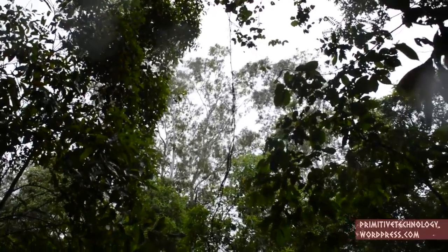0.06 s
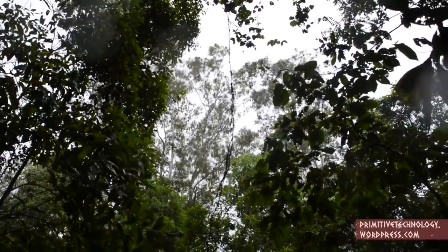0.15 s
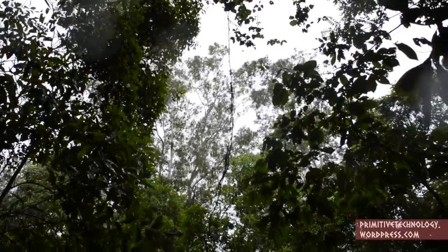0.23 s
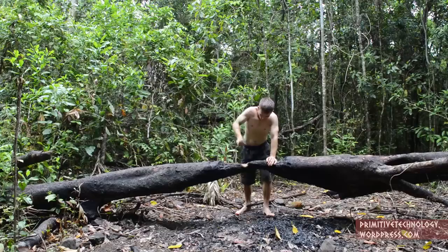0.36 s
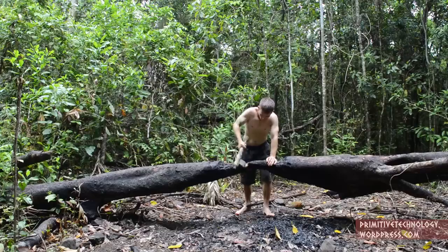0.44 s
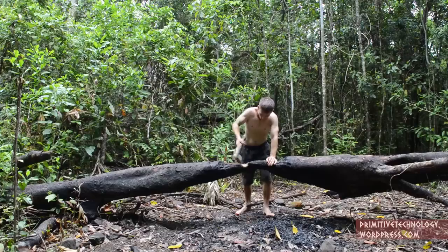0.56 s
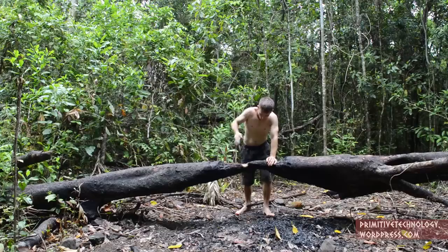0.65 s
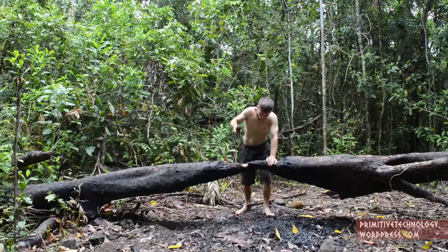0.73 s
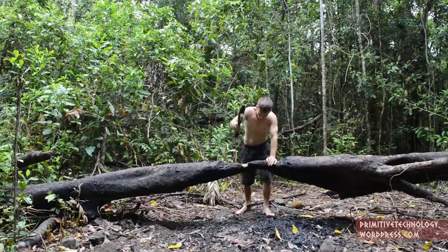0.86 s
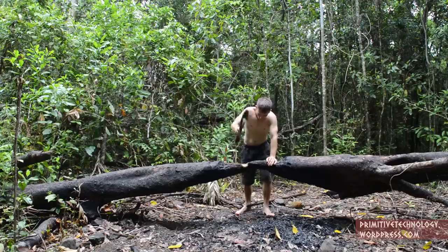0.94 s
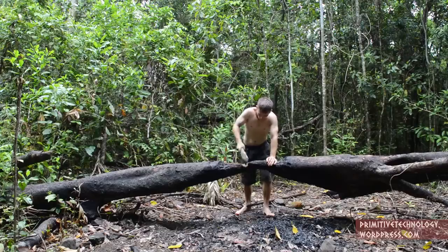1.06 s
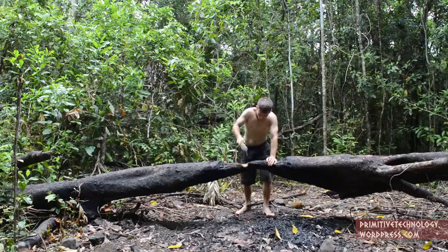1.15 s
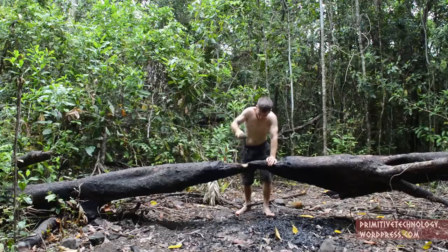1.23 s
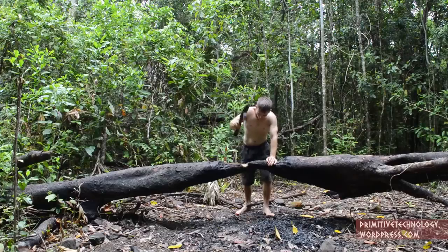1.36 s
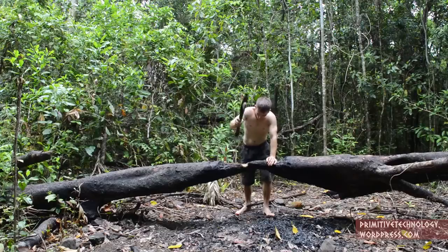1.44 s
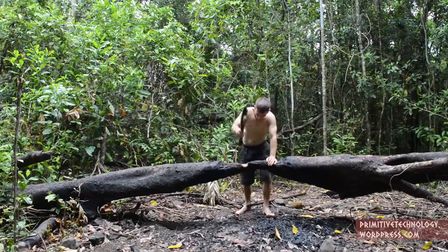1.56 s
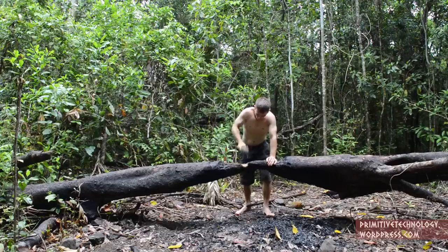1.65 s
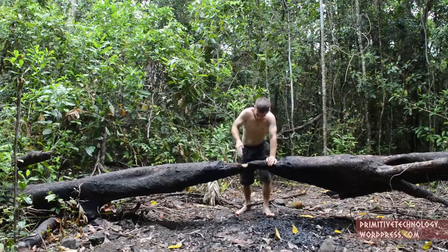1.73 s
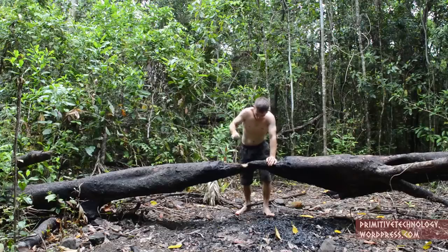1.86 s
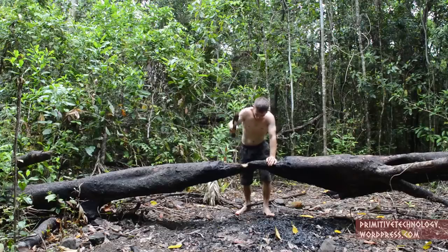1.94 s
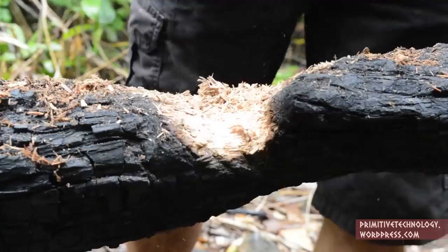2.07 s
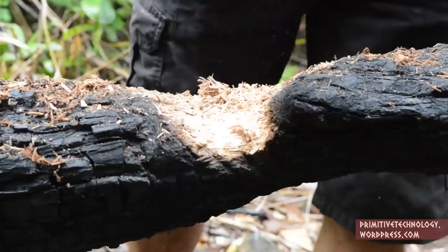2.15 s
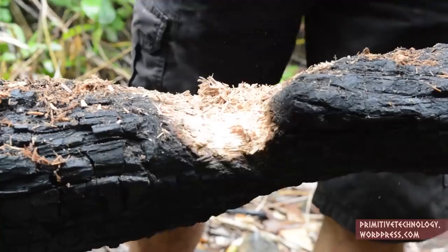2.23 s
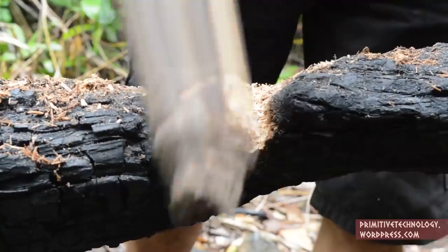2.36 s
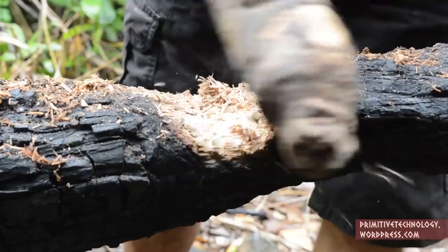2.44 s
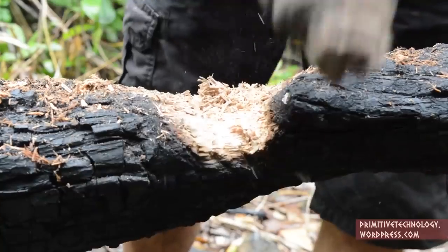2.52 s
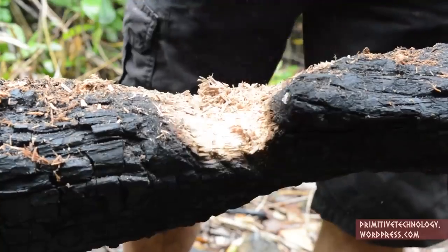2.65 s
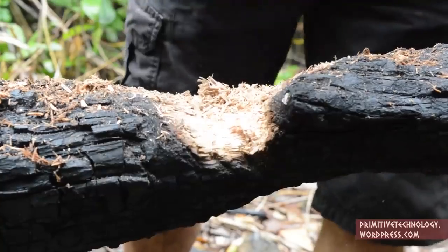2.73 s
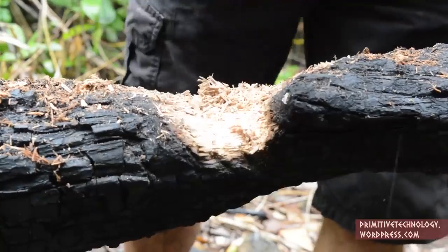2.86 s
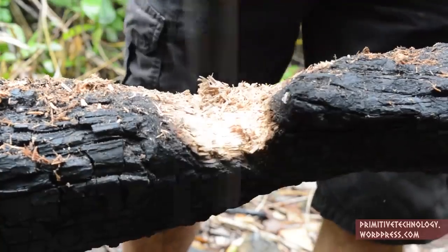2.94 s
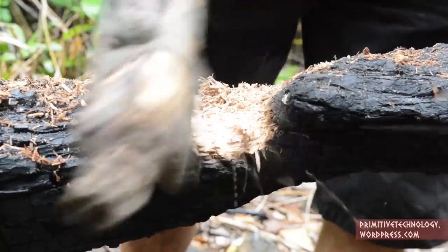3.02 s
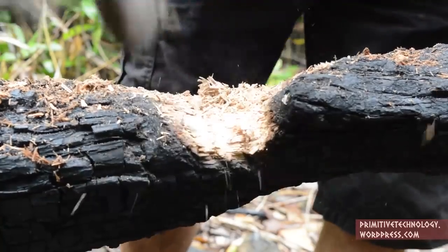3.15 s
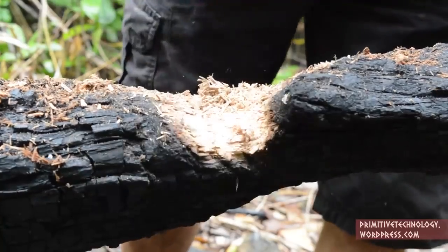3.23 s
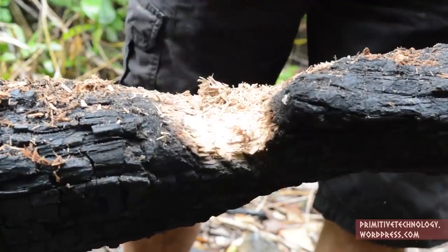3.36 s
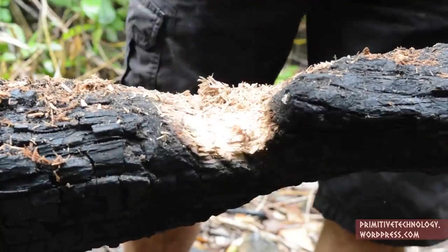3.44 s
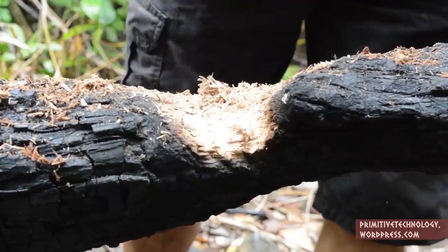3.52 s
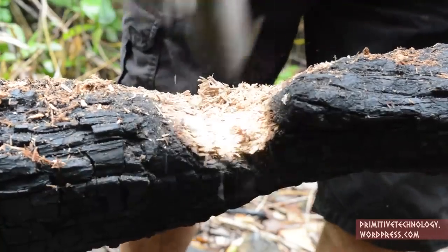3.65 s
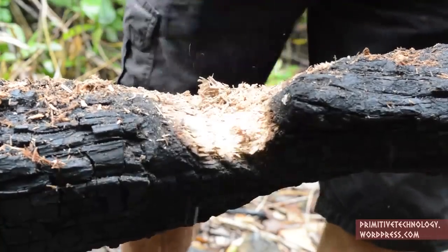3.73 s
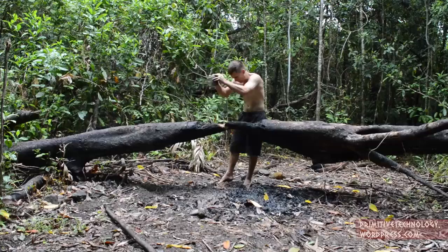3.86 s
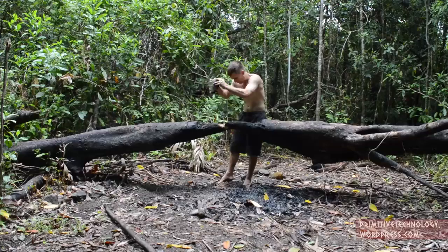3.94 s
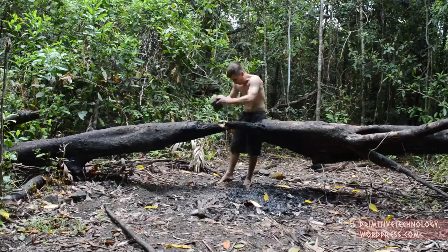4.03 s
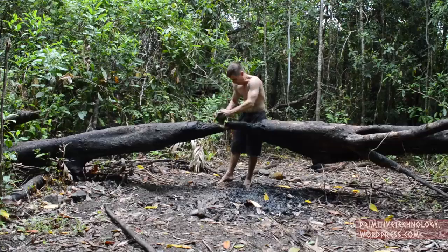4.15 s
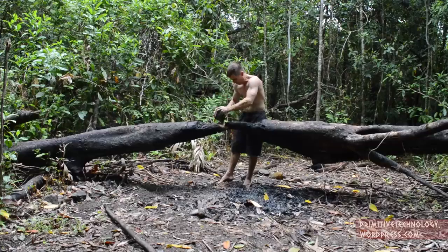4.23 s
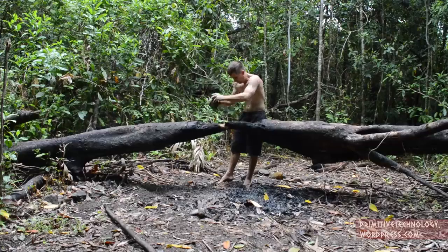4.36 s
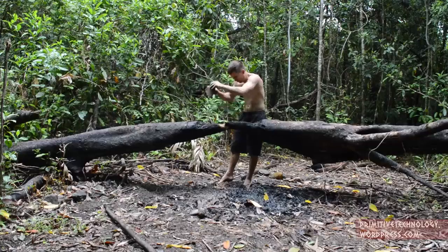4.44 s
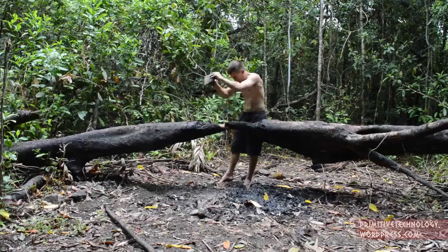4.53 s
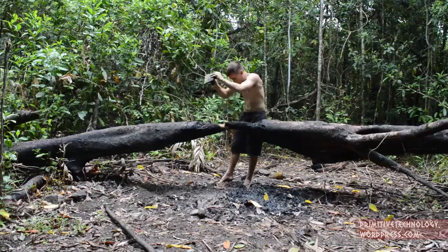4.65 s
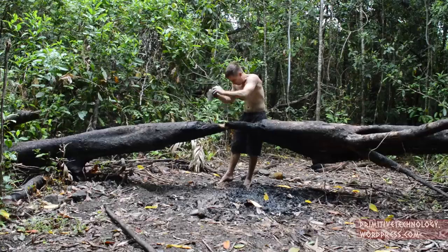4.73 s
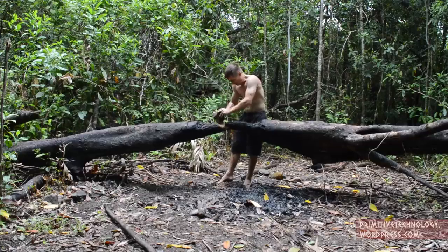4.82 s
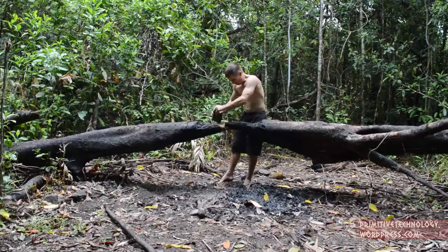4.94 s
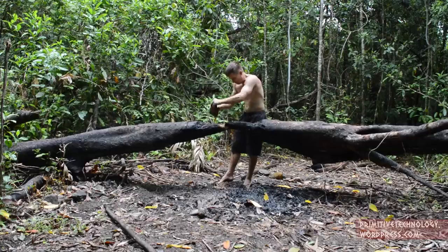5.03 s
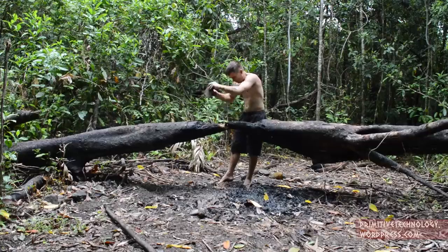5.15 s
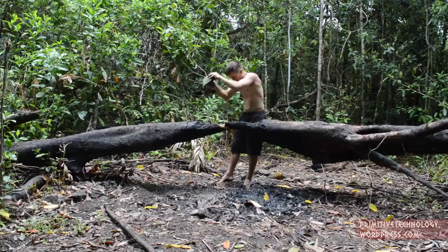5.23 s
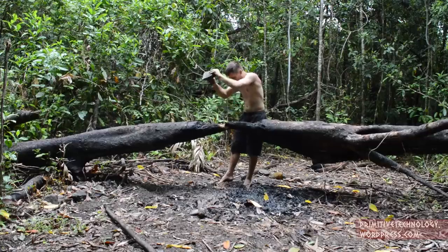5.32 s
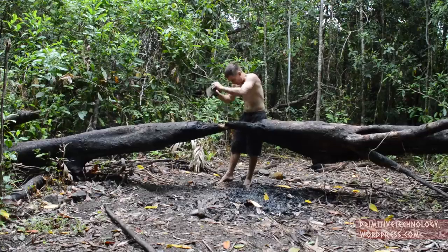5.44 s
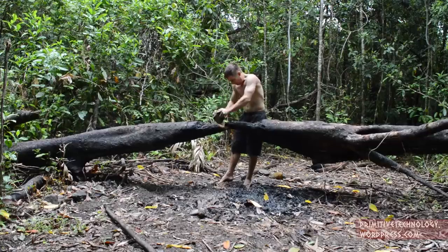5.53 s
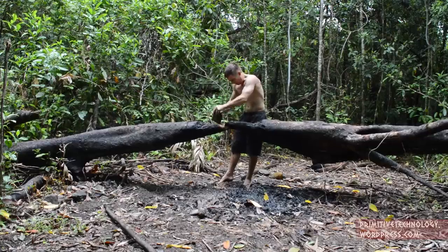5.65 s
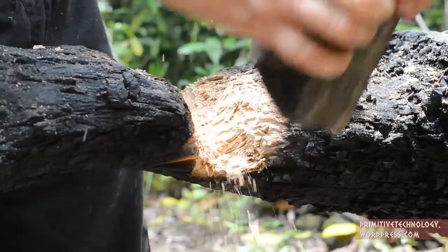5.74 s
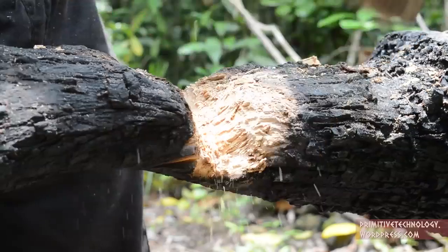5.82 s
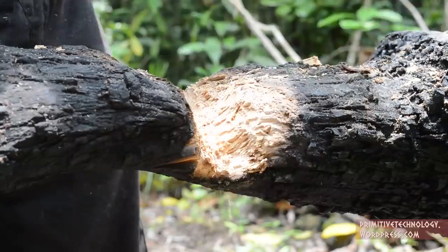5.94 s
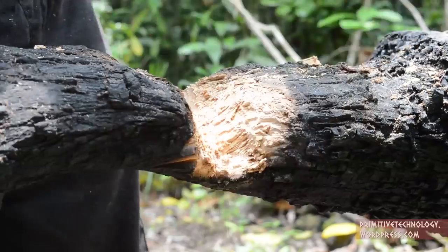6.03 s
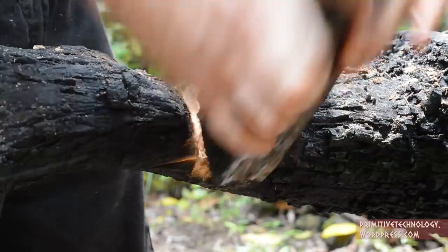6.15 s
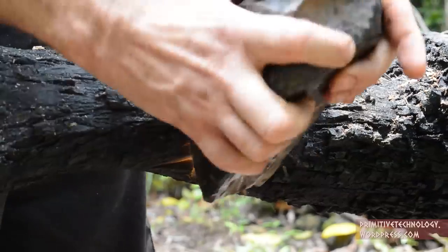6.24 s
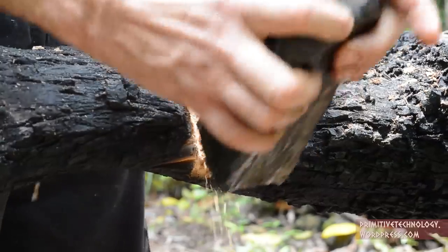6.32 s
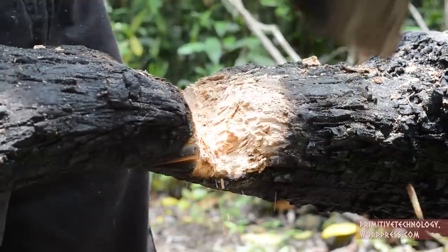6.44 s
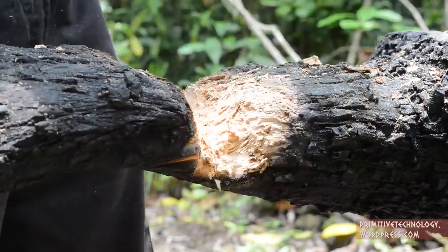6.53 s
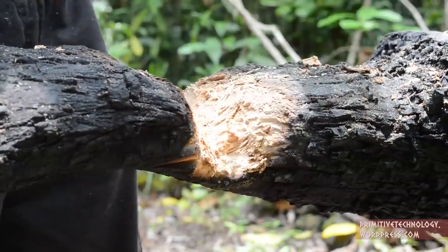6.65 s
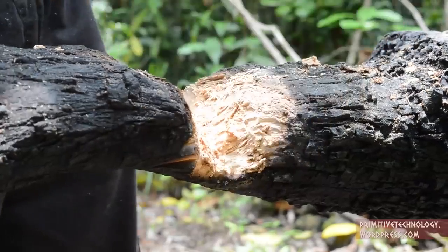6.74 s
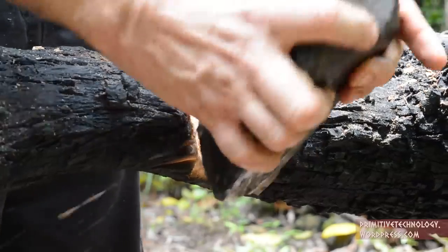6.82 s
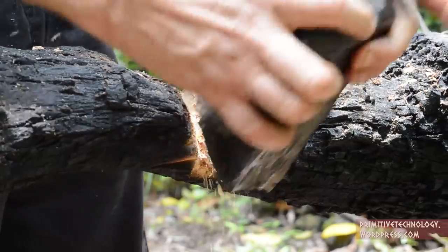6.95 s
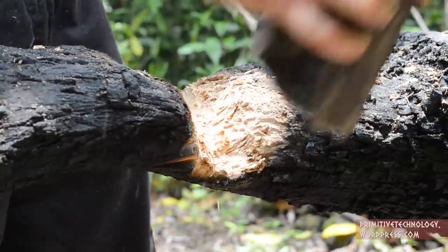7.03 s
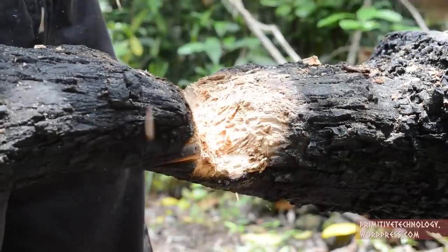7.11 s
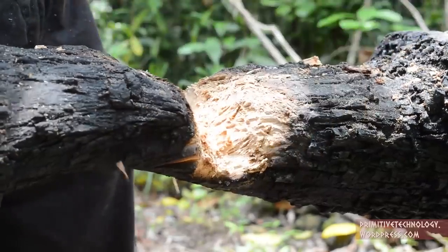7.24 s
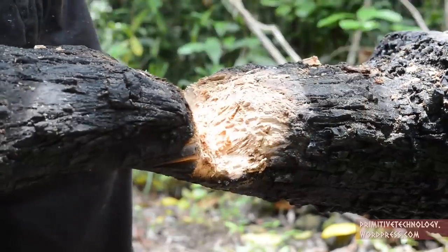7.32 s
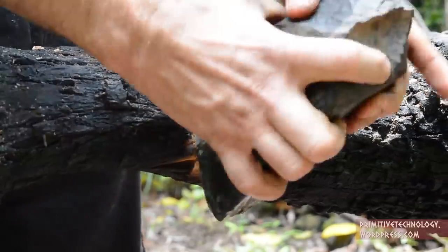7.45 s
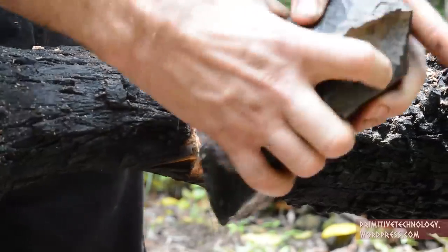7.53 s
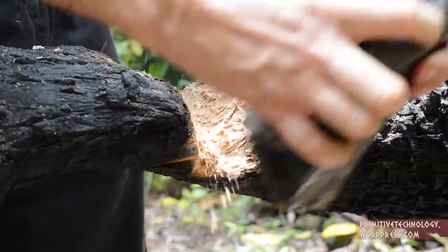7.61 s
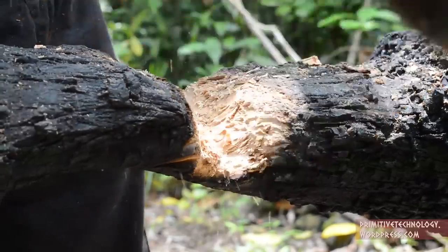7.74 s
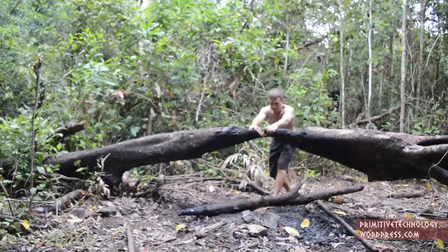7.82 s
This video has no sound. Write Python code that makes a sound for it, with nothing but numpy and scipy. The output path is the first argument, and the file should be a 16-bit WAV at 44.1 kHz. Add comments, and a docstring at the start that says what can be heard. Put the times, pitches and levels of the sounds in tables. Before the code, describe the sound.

Outdoor mono sound of twelve evenly paced stone blows on a burnt trunk, roughly one every 0.6 seconds. Each is a short hollow knock with a low thud and gritty fibre crunch, its tail scattering among trees. The microphone alternates far and near; the hardest close hits slightly overload and briefly duck the insects. A buzzing mid-pitched cicada band with thin high shimmer continues throughout, with small rasping swells.

```python
"""Stone on a charred log in a rainforest

A hand-held stone strikes a log twelve times, heard from several places, far and near, amid droning cicadas.
Each blow sums damped modes of notch, trunk and stone with bursts of crushing noise; the trees echo it.
Insects, air, a breeze and small ticks are shaped noise. A gain control ducks the whole sound after
strong blows, whose first milliseconds can clip.
"""
import sys
import numpy as np
from scipy import signal
from scipy.fft import rfft, irfft, next_fast_len
from scipy.io import wavfile
from scipy.ndimage import map_coordinates

SR = 44100
rng = np.random.default_rng(int(sys.argv[2]) if len(sys.argv) > 2 else 0)


def transcribe(signal):
    """Save signal, clipped to [-1, 1], as a 16-bit WAV file at the path in sys.argv[1]."""
    frames = np.atleast_2d(signal).T
    limited = np.clip(frames, -1, 1)
    pcm = np.round(limited * 32767).astype(np.int16)
    wavfile.write(sys.argv[1], SR, pcm)


N = 347508


def amp(db):
    """Level to amplitude ratio: 20 dB is a factor of ten."""
    return 10 ** (np.asarray(db) / 20)


def unit(x):
    """Normalisation to an rms of 1."""
    return x / np.sqrt(np.mean(x ** 2) + 1e-20)


def along(points, hz):
    """Linear interpolation of (f, value) points over log frequency."""
    f, value = np.transpose(points)
    return np.interp(np.log(hz + 1e-3), np.log(f), value)


def noise(spectrum, size, scale=1):
    """Spectral shaping of white noise to rms 1; scale multiplies the frequencies of the spectrum."""
    m = next_fast_len(size)
    hz = np.fft.rfftfreq(m, 1 / SR)
    gain = amp(along(spectrum, hz / scale))
    white = rng.standard_normal(m)
    return unit(irfft(rfft(white) * gain, m)[:size])


def wobble(rate, size):
    """Slow random modulation: a smooth curve through random knots, rate of them a second."""
    knots = rng.standard_normal(int(size * rate / SR) + 4)
    return map_coordinates(knots, [np.arange(size) * rate / SR])


def add(track, s, sound):
    """Linear superposition of a sound on the track from time s."""
    part = track[max(round(s * SR), 0):][:len(sound)]
    part += sound[:len(part)]


def stay(s, size):
    """Crossover of listening places: a sound begun at s fades in 4.7 ms when the listener moves on."""
    leave = min([row[0] for row in PLACES if row[0] > s] + [N / SR + 1])
    return np.clip(.5 + (leave - s - np.arange(size) / SR) / 0.0047, 0, 1)


# The cicada drone's narrow band: f/drone pitch, relative spectral density level/dB
DRONE_BAND = [(.7, -70), (.86, -23), (.92, -14.5), (.965, 0.5), (1.015, 2), (1.06, -6), (1.1, -6),
              (1.17, -20), (1.25, -30.5), (1.5, -56)]


def drone(size, pitch_hz, evenness, pulsing):
    """Incoherent blending of many insects into one band, its envelope evened and pulsed by tymbals."""
    choir = signal.hilbert(noise(DRONE_BAND, next_fast_len(size), pitch_hz))[:size]
    even = unit(choir.real / (np.abs(choir) + 0.5) ** evenness)
    pulse_hz = 112 + 7 * wobble(25.3, size)
    tymbal = np.sin(2 * np.pi * np.cumsum(pulse_hz) / SR)
    return even * (1 + pulsing * tymbal) * amp(0.47 * wobble(8.46, size))


# High cicadas' band: f/Hz, relative spectral density level/dB
HIGH_BAND = [(5500, -68), (7000, -16), (8000, -5), (8550, -1.5), (8850, 1), (9150, -0.5), (9600, -2),
             (10500, -16.5), (12000, -30), (14500, -41.5), (16000, -63)]


def high_cicadas(size):
    """Band noise with slow and fast amplitude modulation: a lightly fluttering high choir."""
    flutter_db = 0.31 * wobble(6.05, size) + 0.41 * wobble(700, size)
    return noise(HIGH_BAND, size) * amp(flutter_db)


# Far cicadas' broad band: f/Hz, relative spectral density level/dB
FAR_BAND = [(2500, -14.5), (3500, -16), (4250, -6.5), (4500, -2.5), (5000, -5), (6300, -5), (7700, 1.5),
            (9500, -1.5), (11000, -15.5), (14000, -34), (16000, -47)]


def far_cicadas(size):
    """Incoherent superposition: distant singers merge into steady broadband noise."""
    return noise(FAR_BAND, size)


# Lower-voiced cicada's band: f/Hz, relative spectral density level/dB
LOW_BAND = [(5800, -57), (6600, -5.5), (6950, 6), (7300, 3.5), (7900, -21), (9000, -65)]
# Its silences: start t/s, length/s
PAUSES = [(2.472, .27), (6.21, .14)]
STOP_S, RESUME_S = 0.063, 0.31  # linear fades before and after each silence


def low_cicada(s, size):
    """Gated band noise from time s: one cicada stops quickly at each pause and resumes slowly."""
    t = s + np.arange(size) / SR
    gate = np.ones(size)
    for stop, length in PAUSES:
        fall = (stop - t) / STOP_S
        rise = (t - stop - length) / RESUME_S
        gate *= np.clip(np.maximum(fall, rise), 0, 1)
    return noise(LOW_BAND, size) * gate


# Moving forest air: f/Hz, relative spectral density level/dB
AIR_BAND = [(20, -30), (70, 0.5), (200, 0), (500, 3.5), (1000, 1), (2000, 1), (4000, -0.5), (8000, -55),
            (15000, -36)]


def forest_air(size):
    """Turbulence as stationary broadband noise."""
    return noise(AIR_BAND, size)


# Listening places: start t/s, drone level/dB, drone pitch f/Hz, high cicadas level/dB,
# far cicadas level/dB, low cicada level/dB, air level/dB
PLACES = [ (0, -21, 2230, -19.5, -30.5, -37, -34), (.38, -24.5, 2274, -60, -34, -60, -45.5),
          (2.13, -32, 2224, -27, -37.5, -37, -45.5), (3.97, -28.2, 2250, -25.5, -35.5, -42, -47),
          (5.8, -28, 2256, -25.5, -36, -34.5, -47.5)]


def insects():
    """Superposition of cicadas and moving air, in a different balance at each listening place."""
    out = np.zeros(N)
    ends = [row[0] for row in PLACES[1:]] + [N / SR]
    for (s, drone_db, drone_hz, high_db, far_db, low_db, air_db), end in zip(PLACES, ends):
        size = int((end - s) * SR) + SR // 50  # overlaps the next place
        mix = amp(drone_db) * drone(size, drone_hz, evenness=0.15, pulsing=0.24)
        mix += amp(high_db) * high_cicadas(size)
        mix += amp(far_db) * far_cicadas(size)
        mix += amp(low_db) * low_cicada(s, size)
        mix += amp(air_db) * forest_air(size)
        arrive = np.minimum(np.arange(size) / SR / 0.001, 1)
        add(out, s, mix * arrive * stay(s, size))
    return out


# Breeze rumble on the microphone: f/Hz, relative spectral density level/dB
BUFFET_BAND = [(15, -1), (40, -4), (85, 2), (130, -39), (300, -59), (1000, -80)]
BREEZE_DB, GUST_DB, GUST_RATE = -45, 4, 10  # level/dB, gust depth/dB, gust knots per s


def breeze():
    """Turbulent pressure on the microphone: gust-modulated low noise at the first place only."""
    gusts = amp(BREEZE_DB + GUST_DB * wobble(GUST_RATE, N))
    return noise(BUFFET_BAND, N) * gusts * stay(0, N)


# Small ticks and one short hiss, of uncertain source: t/s, level/dB, f/Hz, t60/s
TICKS = [(0.184, -24, 10000, .03), (2.278, -22, 9600, .016), (2.518, -19.5, 1300, .04),
         (3.283, -30, 454, .05), (5.718, -31, 5000, 0.12), (6.090, -37.5, 590, 0.042)]


def ticks():
    """Exponential decay: each small tick or short hiss is decaying band noise."""
    out, t = np.zeros(N), np.arange(SR // 10) / SR
    tick_band = [(.2, -1), (1, 9), (3, -45), (12, -49)]  # f/tick pitch, density level/dB
    for s, db, hz, t60 in TICKS:
        add(out, s, amp(db - 60 * t / t60) * noise(tick_band, len(t), hz))
    return out


# Modes of the struck notch: f/knock pitch, level/dB, t60/s
NOTCH_MODES = [(.3, -14.5, 0.029), (0.66, -11.5, 0.054), (0.999, 7.5, 0.011), (1.299, -5.5, 0.029),
               (1.649, -10, 0.016), (3.1, -8.5, 0.0091)]


def knock(t, pitch_hz):
    """Modal ringing: the stone's first contact excites damped modes of the wood round the notch."""
    ring = np.zeros(len(t))
    for multiple, db, t60 in NOTCH_MODES:
        hz = pitch_hz * multiple * (1 + 0.032 * rng.standard_normal())
        ring += amp(db - 60 * t / t60) * np.sin(2 * np.pi * hz * t)
    return ring * (1 - np.exp(-(t / 0.0012) ** 2))


# Trunk modes: f/Hz, mean level/dB before weighting round the thud's centre, t60/s
TRUNK_MODES = [(101.4, -17.5, 0.37), (133.7, -7, 0.12), (175.3, -7.5, 0.21), (197.6, -0.5, 0.15),
               (265.5, -2, 0.092), (340.4, -3, 0.13), (461.3, -3, 0.13), (557, -0.5, 0.066),
               (636, -0.5, 0.055), (718, -2, 0.087), (872, -1, 0.042), (1230, 5.5, 0.026)]


def thud(t, centre_hz, rise, octaves):
    """Modal excitation by a push: a lower centre favours the trunk's low modes, giving a deeper thud."""
    hz, db, t60 = np.transpose(TRUNK_MODES)[:, :, None]
    distance = np.abs(np.log2(hz / centre_hz) / octaves)
    size = amp(db + rng.standard_normal(hz.shape)) / (1 + distance ** 1.98)
    # rise is the build-up time at 220 Hz; lower modes take longer
    build = rise * (220 / hz) ** 0.355
    late = t - build
    decay = amp(-60 * np.maximum(late, 0) / t60)
    envelope = np.where(late < 0, (t / build) ** 1.68, decay)
    phase = rng.uniform(-np.pi, np.pi, hz.shape) * 0.87
    modes = size * envelope * np.sin(2 * np.pi * hz * late + phase)
    return np.sum(modes, axis=0) * .72 / np.linalg.norm(size)


# Crushed fibres and grit: f/Hz, relative spectral density level/dB
CRUNCH_BAND = [(300, 6.5), (1000, -2), (2400, 2), (3300, 1.5), (5000, 0.5), (7000, 1), (9500, 4),
               (12000, -5), (16000, -15)]
# Crumbs spraying into leaf litter: f/Hz, relative spectral density level/dB
SPRAY_BAND = [(800, -2), (3500, 0), (6500, 0), (10000, -8), (16000, -38)]


def crunch(t, t60, spray_db, spray_t60):
    """Fracture noise: fibres and charcoal crush in a burst; the longer it lasts, the more crumbs spray."""
    grit = unit(noise(CRUNCH_BAND, len(t)) * amp(5.9 * wobble(906, len(t))))
    crumbs = unit(noise(SPRAY_BAND, len(t)) * amp(3.7 * wobble(300, len(t))))
    spray = crumbs * t60 / spray_t60 * amp(spray_db - 60 * t / spray_t60)
    return (grit * amp(-60 * t / t60) + spray) * (1 - np.exp(-(t / 0.0009) ** 2))


# Modes of the stone: f/Hz, mean level/dB, t60/s
STONE_MODES = [(2323, -0.5, 0.021), (3564, -4, 0.023), (6310, 0.5, 0.044), (9230, 6, .03),
               (12300, -5, 0.04)]


def clink(t):
    """Modal ringing of the stone: a brief bright clink, its mode levels drawn at random for each blow."""
    hz, db, t60 = np.transpose(STONE_MODES)[:, :, None]
    level_db = db + 2 * rng.standard_normal(hz.shape)
    ring = amp(level_db - 60 * t / t60) * np.sin(2 * np.pi * hz * t)
    return ring.sum(axis=0) * (1 - np.exp(-t / 0.00038))


# Scatter from near trunks: f/upper edge, relative spectral density level/dB
NEAR_BAND = [(.04, -24), (.13, -17), (.25, 2), (.7, 1), (1, -2), (1.5, -6), (2.5, -20), (6, -32.5),
             (25, -42)]


def near_scatter(t, edge_hz, db, t60):
    """Early scattering: ground and near trunks answer a blow at once, then decay."""
    onset = 1 - np.exp(-(t / 0.0068) ** 2)
    return noise(NEAR_BAND, len(t), edge_hz) * amp(db - 60 * t / t60) * onset


# Echo from the deep forest: f/upper edge, relative spectral density level/dB
DEEP_BAND = [(.04, -50), (.17, -10), (.35, -3.5), (.6, 1.5), (.9, -2), (1.2, -8.5), (1.7, -16.5), (3, -23),
             (8, -58), (25, -55)]


def deep_echo(t, edge_hz, t60):
    """Late reverberation: the deep forest answers more slowly, in uneven slaps."""
    slaps = unit(amp(2.66 * wobble(90.0, len(t)) + 1.35 * wobble(15.1, len(t))))
    onset = 1 - np.exp(-t / 0.031)
    return noise(DEEP_BAND, len(t), edge_hz) * slaps * amp(-60 * t / t60) * onset


# Blows: t/s, knock level/dB, knock pitch f/Hz, thud level/dB, thud centre f/Hz, crunch level/dB
BLOWS = [ (0.5100, 5, 1095, 1.5, 570, -5.5), (1.1790, 4.5, 736, 4, 507, -4),
         (1.7904, -1, 1108, 2.5, 406, -4), (2.4658, 7.5, 768, 4, 308, 3),
         (3.0663, 15, 1024, 0.5, 296, -0.5), (3.6605, 19, 792, 11.5, 415, 2),
         (4.1893, -8, 1156, -0.5, 181, -11.5), (4.9171, -2.5, 790, -0.5, 180, -14.5),
         (5.6390, 0.5, 958, 2, 205, -4), (6.2550, 3.5, 634, -0.5, 312, -1), (6.901, 0.5, 812, -0.5, 324, 1),
         (7.5172, 2.5, 830, 5.5, 221.2, 3)]
# How chopping carries, by turns far and near: start t/s, echo gain re blow level/dB, crunch t60/s,
# clink gain re crunch level/dB
RANGES = [(.38, -22, .021, -22), (2.13, -33, 0.0099, -17.5), (3.97, -25, 0.034, -14),
          (5.8, -32.5, 0.036, -10.5)]
ECHO_EDGE = 1.087  # echo's upper edge over the blow's mean pitch


def chopping():
    """Impact superposition: knock, thud, crunch and clink; knock and thud set the echo's level and pitch."""
    out, t, long_t = np.zeros(N), np.arange(SR // 7) / SR, np.arange(SR) / SR
    for s, knock_db, knock_hz, thud_db, thud_hz, crunch_db in BLOWS:
        _, echo_db, crunch_t60, clink_db = [row for row in RANGES if row[0] <= s][-1]
        add(out, s, amp(knock_db) * knock(t, knock_hz))
        add(out, s, amp(thud_db) * thud(t, thud_hz, rise=.0115, octaves=1.11))
        add(out, s, amp(crunch_db) * crunch(t, crunch_t60, spray_db=-10.5, spray_t60=0.27))
        add(out, s, amp(crunch_db + clink_db) * clink(t))
        strength = amp(knock_db) + amp(thud_db)
        # geometric mean, weighted by amplitude
        mean_hz = thud_hz * (knock_hz / thud_hz) ** (amp(knock_db) / strength)
        edge_hz = ECHO_EDGE * mean_hz
        near = near_scatter(long_t, edge_hz, db=10.0, t60=0.28)
        echo = (near + deep_echo(long_t, edge_hz, t60=1.0)) / 2
        add(out, s, strength * amp(echo_db) * echo * stay(s, SR))
    return out


# Rasping insect's hiss: f/Hz, relative spectral density level/dB
HISS_BAND = [(2800, -36), (3900, -4.5), (4600, -3), (6100, 1.5), (7000, -8), (9000, -55)]
# Its swells: centre t/s, peak level/dB
SWELLS = [(.77, -34.5), (1.31, -39.5), (1.75, -39.5), (2.893, -35.5), (3.385, -39.5), (4.144, -42),
          (4.627, -38), (5.58, -41), (7.44, -41)]
SWELL_HALF_S = 0.097  # standard deviation of each bell-shaped swell


def rasper():
    """Amplitude-modulated hiss: another insect rasps in short swells of one length."""
    t = np.arange(N) / SR
    swell = sum(amp(db) * np.exp(-((t - s) / SWELL_HALF_S) ** 2 / 2) for s, db in SWELLS)
    return swell * unit(noise(HISS_BAND, N) * amp(1.9 * wobble(70, N)))


def scene():
    """Linear superposition of insects, breeze, ticks and chopping in one channel."""
    return (insects() + breeze() + ticks() + chopping() + rasper())[None]


def ducking(excess_db, attack, release):
    """Peak-following gain reduction in dB: each peak relaxes exponentially; the gain lags a little."""
    relax = np.arange(N) / SR / release
    log_excess = np.log(np.maximum(excess_db, 1e-6))
    held = np.exp(np.maximum.accumulate(log_excess + relax) - relax)
    step = 1 / (attack * SR)
    return signal.lfilter([step], [1, step - 1], held)


def record(dry):
    """Dynamic compression, clipping of what it is too slow to catch, and low-pass band limiting."""
    threshold_db, slope = -4.0, 0.81  # slope: dB of reduction per dB over the threshold
    level_db = 20 * np.log10(np.abs(dry[0]) + 1e-9)
    reduction_db = ducking(slope * (level_db - threshold_db), attack=0.006, release=0.086)
    clipped = np.clip(dry * amp(-reduction_db), -1, 1)
    band_limit = signal.firwin(129, 15900, fs=SR)  # upper limit in Hz
    return signal.fftconvolve(clipped, band_limit[None], mode="same")


dry = scene()
out = record(dry)
transcribe(out)
```